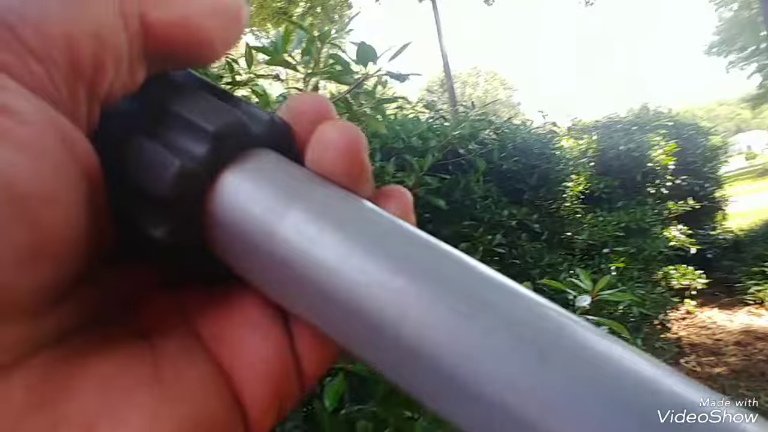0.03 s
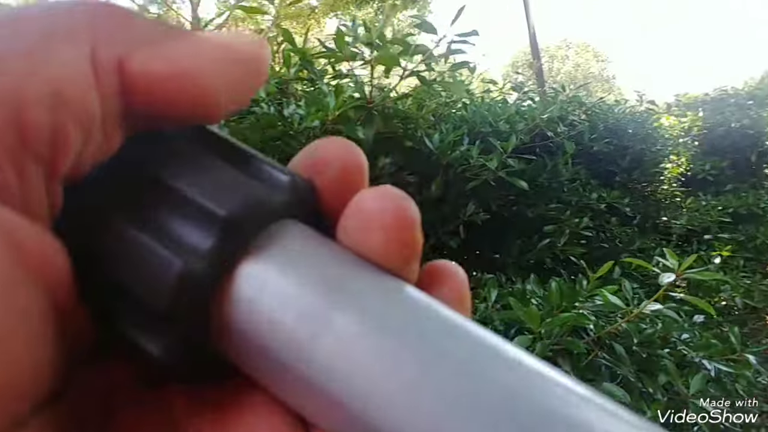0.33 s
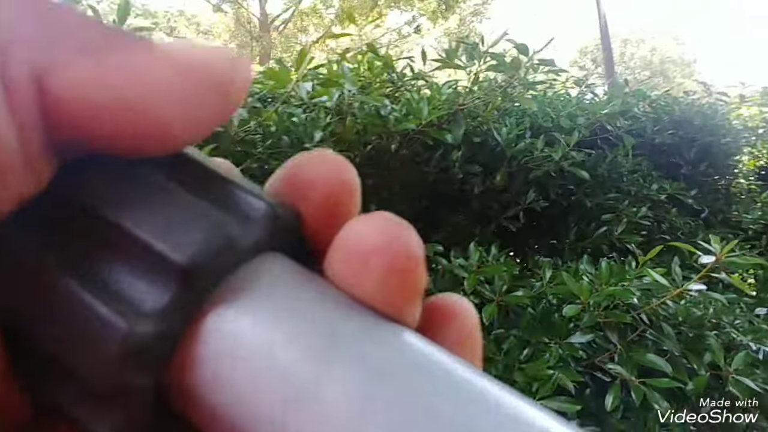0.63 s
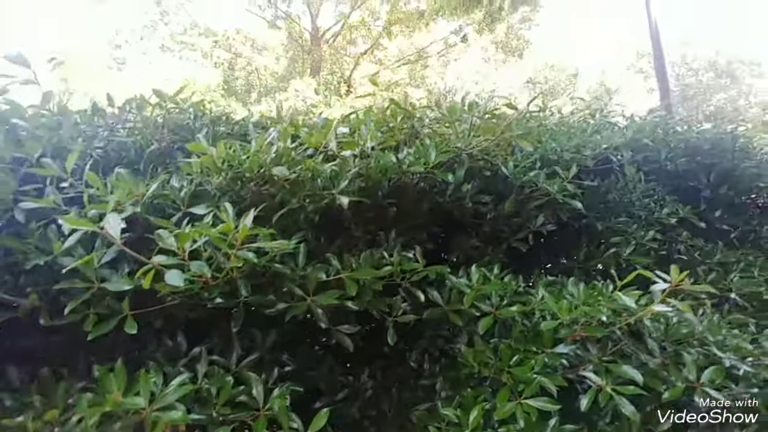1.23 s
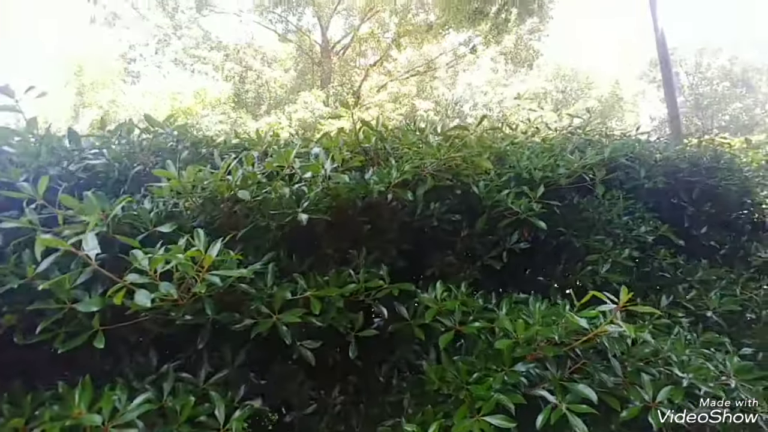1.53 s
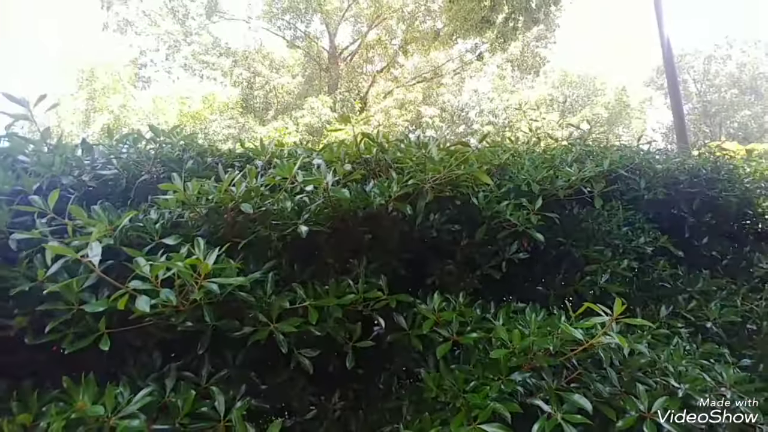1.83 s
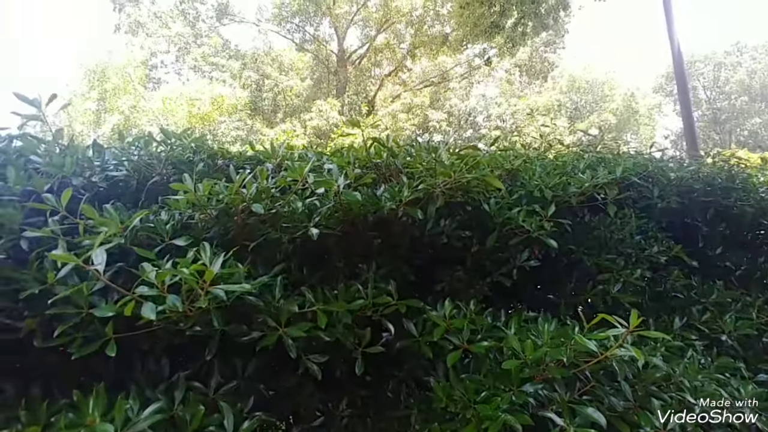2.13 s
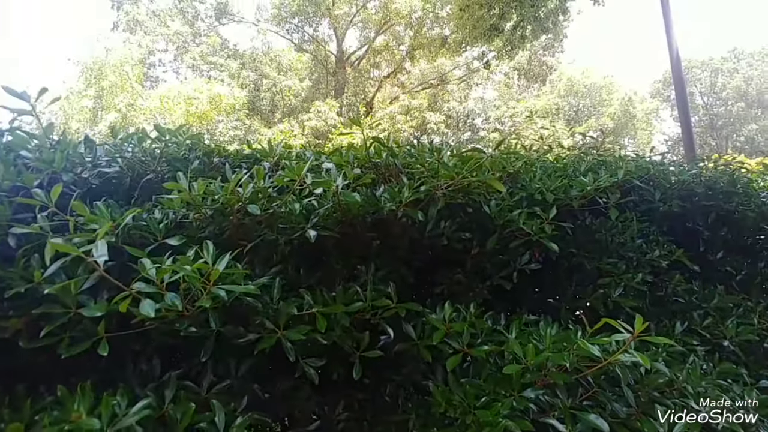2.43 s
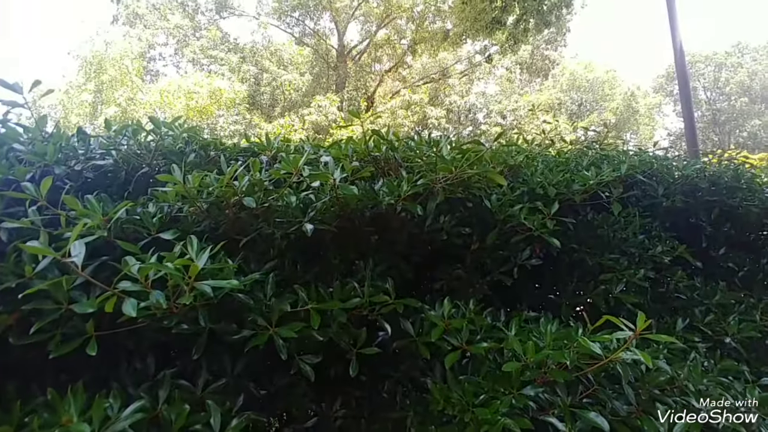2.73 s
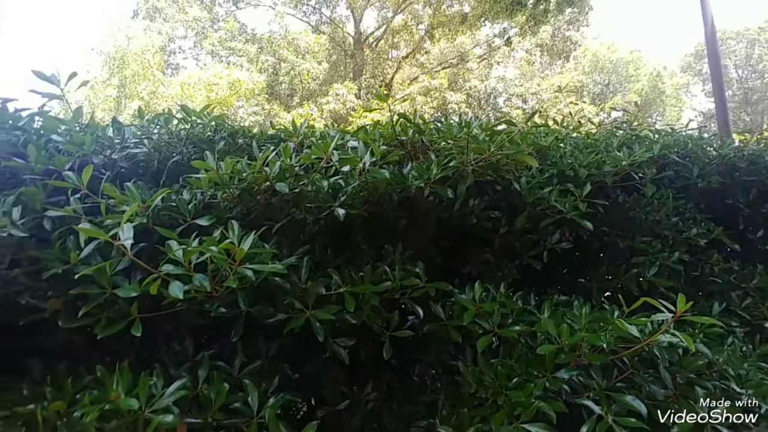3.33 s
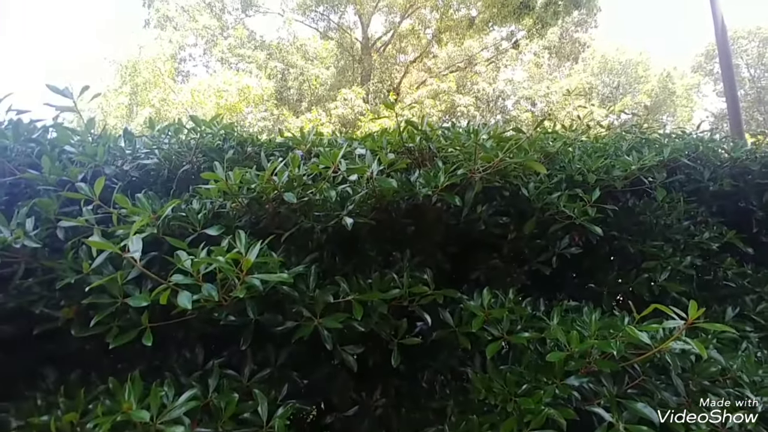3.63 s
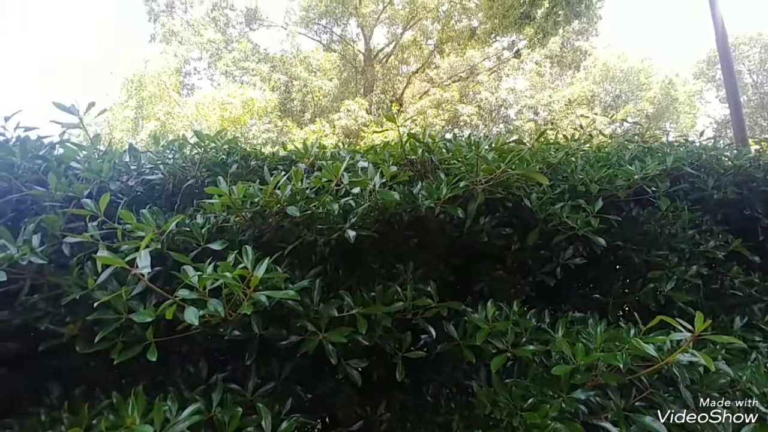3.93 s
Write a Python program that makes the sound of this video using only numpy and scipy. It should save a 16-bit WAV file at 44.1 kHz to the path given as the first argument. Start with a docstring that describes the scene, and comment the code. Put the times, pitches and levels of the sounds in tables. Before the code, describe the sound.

An electric hedge trimmer runs close by with a steady hum, whine and gear rattle. At about 1.1 seconds it switches off and falls in pitch, its steel blades scraping and separating into ringing clacks while wind nudges the microphone. It stops with a brief soft squeal near 2.3 seconds. The pole knocks at 2.5, small plastic ticks follow until 3, and faint outdoor ambience lasts to 4 seconds.

```python
"""A garden, with a stereo microphone close to an electric pole hedge trimmer running free.
The motor hums and whines over the rattle of its gears. Switched off, it coasts to a stop under friction,
and the strokes of the steel blades separate into single clacks, ending in a brief squeal.
Wind nudges the microphone, the pole knocks and settles, and the plastic handle ticks.
Behind it all lie a quiet outdoor wash and a thin ring in the distance."""
import sys
import numpy as np
from scipy import signal
from scipy.fft import rfft, irfft
from scipy.io import wavfile

SR = 44100
rng = np.random.default_rng(int(sys.argv[2]) if len(sys.argv) > 2 else 0)


def unload_wav(signal):
    """Save mono or channel-first audio to the path in sys.argv[1] as 16-bit WAV at rate SR, clipped to [-1, 1]."""
    wavfile.write(
        sys.argv[1],
        SR,
        np.round(np.clip(np.atleast_2d(signal).T, -1, 1) * 32767).astype(np.int16),
    )


N = 176400
T = np.arange(N) / SR


def amp(db):
    """Decibels to gain."""
    return np.exp(np.asarray(db) * np.log(10) / 20)


def unit(x):
    """Scales to rms 1."""
    return x / np.sqrt(np.mean(x ** 2) + 1e-20)


def curve(points):
    """Joins (time_s, value) points by straight lines, holding the end values."""
    return np.interp(T, *np.transpose(points))


def bump(centre_s, width_s):
    """A bell-shaped envelope peaking at 1."""
    return np.exp(-.5 * ((T - centre_s) / width_s) ** 2)


def drift(rate_hz):
    """Random wander up to about this rate, rms 1."""
    noise = rng.standard_normal(N // 16 + 1)
    hz = np.fft.rfftfreq(len(noise), 16 / SR)
    slow = irfft(rfft(noise) / (1 + (hz / rate_hz) ** 4), len(noise))
    return np.interp(T, np.linspace(0, T[-1], len(slow)), unit(slow))


def stereo_noise(likeness):
    """Left and right noise whose likeness fades in the treble."""
    left, other = rfft(rng.standard_normal((2, N)))
    likeness = likeness / (1 + (np.fft.rfftfreq(N, 1 / SR) / 6000) ** 4)
    right = likeness * left + np.sqrt(1 - likeness ** 2) * other
    return irfft(np.array([left, right]), N)


def colour(drive, spectrum, size=4096):
    """Rings a stereo drive through a minimum-phase filter with this spectrum and unit mean power gain."""
    hz, *sides_db = np.transpose(spectrum)
    bin_hz = abs(np.fft.fftfreq(size, 1 / SR))
    log_gain = np.log([amp(np.interp(np.log(bin_hz + 1), np.log(hz), db)) for db in sides_db])
    response = np.fft.ifft(np.exp(np.conj(signal.hilbert(log_gain)))).real[:, :size // 2]
    response /= np.sqrt((response ** 2).sum() / 2)
    return signal.oaconvolve(drive, response, axes=1)[:, :N]


def fuzzy_tone(hz, width_hz):
    """Noise in one narrow resonance."""
    phase = 2 * np.pi * hz * T
    return unit(drift(width_hz / 2) * np.cos(phase) + drift(width_hz / 2) * np.sin(phase))


def mode(hz, wander=.006):
    """A clean ring whose pitch wanders a little."""
    pitch_hz = hz * (1 + wander * drift(18))
    return unit(np.sin(2 * np.pi * np.cumsum(pitch_hz) / SR))


def blow(start_s, level_db, rise_s, t60_s):
    """Envelope of one contact: quick rise, exponential decay."""
    envelope, at = np.zeros(N), round(start_s * SR)
    age_s = T[:min(SR // 2, N - at)]
    decay_db = 60 * np.maximum(age_s - rise_s, 0) / t60_s
    envelope[at:at + len(age_s)] = amp(level_db - decay_db) * np.minimum(age_s / rise_s, 1)
    return envelope


def chatter(hits_per_s, spread_db, hiss_share, likeness):
    """Tiny impacts of uneven size in a bed of friction noise."""
    hits = rng.random(N) < hits_per_s / SR
    sizes = amp(spread_db * np.minimum(rng.exponential(1, N), 3))
    power = (1 - hiss_share) * unit(hits * sizes) ** 2 + hiss_share
    return np.sqrt(power) * stereo_noise(likeness)


# Motor shaft under power: time_s, rate_hz
SHAFT_RATE = [(0, 338.4), (.1, 339.3), (.48, 337.5), (.7, 338.2), (.9, 339.8), (1.075, 339.4)]
TURNS_PER_STROKE = 7


def drivetrain(off_s=1.075, coast_s=1.45):
    """Friction stops the shaft after switch-off; gives speed (1 to 0) and blade position in strokes."""
    speed = np.clip(1 - (T - off_s) / coast_s, 0, 1) ** 1.36
    shaft_hz = curve(SHAFT_RATE) * speed * (1 + .0007 * drift(16))
    strokes = np.cumsum(shaft_hz) / SR / TURNS_PER_STROKE + .3
    return speed, strokes


# Motor tones: cycles_per_stroke
TONE_ORDERS = [2, 7, 14, 63, 105, 147, 210]
# Each tone at full speed: left_db, right_db
TONE_LEVELS = [(-40, -51), (-30, -26.5), (-43, -43), (-35, -41), (-30.5, -32.5), (-43, -51), (-37, -45)]
# How each tone weakens as the shaft slows: speed_exponent
TONE_FALLS = [3, 6, 6, 5, 1.5, 10, 10]


def motor(speed, strokes, whine_order=105):
    """Stroke hum, shaft hum and the whine of gear teeth and fan, each wavering a little."""
    tones = np.zeros((2, N))
    flare = amp(6 * bump(1.11, .09))  # the gear whine flares as the drive lets go
    for order, sides_db, fall in zip(TONE_ORDERS, TONE_LEVELS, TONE_FALLS):
        phase = 2 * np.pi * order * strokes + .2 * drift(45)
        tone = unit(np.sin(phase) * amp(2.2 * drift(32))) * speed ** fall
        if order == whine_order:
            tone *= flare
        tones += amp(sides_db)[:, None] * tone
    return tones


# Resonances of the gear housing: frequency_hz, left_db, right_db
HOUSING_SPECTRUM = [(40, -27, -26), (120, -10.5, -21.5), (219.5, -13.5, -9.0), (300, -9, -8.5),
                    (470, -4.0, -3.5), (590, 1, -2), (704, -4.5, -7), (800, 0, -1.5), (963, -6, 3),
                    (1050, -11, -7), (1340, -4, -4.5), (1600, -5, -14.5), (1890, -10.5, -1),
                    (2160, -8.5, -17), (2550, -8, -11), (2750, -5.5, -13), (3000, -3, -8.5),
                    (3230, -4.5, -8), (3530, -8.5, -6), (4040, -5.5, -18), (4500, -4, -6.5),
                    (4700, -11.5, -14.5), (6600, -15.5, -19), (7100, -13, -25), (8800, -16, -16.5),
                    (12000, -26.5, -38.5)]


def gears(speed, strokes):
    """Loose gear teeth rattle in the housing, throbbing with the stroke and the shaft."""
    phase = 2 * np.pi * strokes
    throb_db = 1.5 * np.cos(phase) + .5 * np.cos(2 * phase) + np.cos(TURNS_PER_STROKE * phase)
    throb_db += .73 * drift(81)
    rattle = unit(chatter(2200, spread_db=3, hiss_share=.66, likeness=.62) * amp(throb_db))
    low = signal.sosfiltfilt(signal.butter(2, 1400, fs=SR, output="sos"), rattle)
    rattle += low * (amp(2.3 * np.tanh(drift(48))) - 1)  # the low knocking is the most uneven
    return colour(rattle * amp(-14.5) * speed ** 2.14, HOUSING_SPECTRUM)


# Blades sliding over each other: time_s, level_db
SCRAPE_LEVEL = [(0, -34.5), (.95, -30), (1.15, -20), (1.42, -19), (1.62, -22), (1.78, -19), (2.0, -20),
                (2.2, -23.5), (2.3, -30.5), (2.4, -45.5), (2.6, -78.5)]
# Last blade reversals, heard singly: start_s, clack_db, ring_db
CLACKS = [(1.402, -15, -28), (1.447, -12, -29), (1.523, -13, -18), (1.558, -25, -18.5), (1.663, -17.5, -22),
          (1.707, -15, -16), (1.749, -14, -21), (1.797, -16, -20), (1.848, -12, -24.5),
          (1.904, -17.5, -25.5), (1.969, -13, -23), (2.041, -28.5, -34), (2.14, -15.5, -44),
          (2.347, -25, -65)]
# Body of the blades: frequency_hz, left_db, right_db
BLADE_SPECTRUM = [(230, -18.5, -23), (340, -12.5, -15), (519, 0.0, -7.5), (700, -13.5, -9),
                  (1080, -7.5, -7.5), (1700, -5.5, -5.5), (2120, -6.5, -7.5), (2250, 1, -2.5),
                  (2380, -5, -12), (2550, -4, -6), (2900, -8, -10.5), (3400, -3, -9.5), (4200, -2.5, -13.5),
                  (4670, -1.0, -3), (5050, -12, -16.5), (6200, -15.5, -23), (8360, -15, -17),
                  (12000, -29.5, -41)]
# Steel ringing at each clack: pitch_hz, gain_db
BLADE_MODES = [(2270, -7), (4400, -6), (4570, -2.5), (4730, -5)]


def blades(speed, strokes, lull_s=.006, rise_s=.003):
    """Steel blades scrape with each stroke, duller as they slow, and clack and ring at the last turns."""
    throb_db = speed * (1.9 * np.cos(2 * np.pi * strokes) + .7 * drift(55)) + .9 * drift(90)
    # The scrape drops as the blades turn round, just before a clack.
    lull_db = 4.5 * sum(np.maximum(1 - abs(T - s + lull_s) / (2 * lull_s), 0) for s, _, _ in CLACKS)
    scrape = chatter(1500, spread_db=1, hiss_share=.72, likeness=.74)
    scrape *= amp(curve(SCRAPE_LEVEL) + throb_db - lull_db)
    dull = signal.lfilter(*signal.butter(1, 2500, fs=SR), scrape)
    scrape = dull + (scrape - dull) * speed ** .91
    contacts = sum(blow(s, db, rise_s, t60_s=.085) for s, db, _ in CLACKS)
    clacks = signal.lfilter([1, -.55], [1], contacts * stereo_noise(likeness=.61))  # treble lift
    passing_mode = mode(3870) * bump(1.85, .11)  # rings only midway through the coast
    steel = sum(amp(db) * mode(hz) for hz, db in BLADE_MODES) + passing_mode
    ring = steel * sum(blow(s, db, rise_s, t60_s=.11) for s, _, db in CLACKS)
    return colour(scrape + clacks, BLADE_SPECTRUM) + ring * amp([[0], [-4]])


# Gusts at the microphone: time_s, level_db
GUSTS = [(1.1, -48), (1.32, -35), (1.44, -29), (1.52, -26.5), (1.65, -47.5), (1.75, -29.5), (1.82, -32.5),
         (1.98, -35), (2.3, -56), (2.45, -58), (3.9, -67), (3.96, -48), (4, -61)]
# Rumble of the buffeting: frequency_hz, left_db, right_db
WIND_SPECTRUM = [(15, -20, -17), (45, -18.5, 8), (119, -15.5, 5), (220, -42.5, -16.5), (2000, -88.5, -77.5)]


def wind():
    """Wind buffets the microphone, mostly its right port."""
    buffeting = stereo_noise(likeness=.086) * amp(curve(GUSTS) + 2.3 * drift(24))
    return colour(buffeting, WIND_SPECTRUM)


def blade_squeal():
    """The blades sing briefly just before they stop."""
    return fuzzy_tone(580, width_hz=39) * amp(-32.5) * bump(2.253, .03)


# The pole knocking and settling: start_s, level_db, rise_s, t60_s
KNOCKS = [(2.504, -23, 0.0097, 0.06), (2.517, -13.5, 0.00093, 0.037), (2.528, -30, .002, 0.37),
          (2.629, -38, .003, 0.1), (2.642, -38.5, .002, 0.061), (2.677, -42.5, 0.004, 0.088)]
# Body of the pole: frequency_hz, left_db, right_db
POLE_SPECTRUM = [(100, -16, -13), (218, -9.5, -14), (455, 4, 1), (684, -7.5, 2), (920, 5.5, 0.5),
                 (1610, -1, -3), (2280, -2, 0), (2570, -13, -26), (3360, -10, -12), (4550, -11.5, -11),
                 (6070, -14, -24), (9900, -22.5, -22), (12000, -33, -56)]


def pole():
    """The pole knocks, then settles with a last hollow tap."""
    contacts = sum(blow(*knock) for knock in KNOCKS)
    knocks = contacts * chatter(2500, spread_db=4.5, hiss_share=.43, likeness=.69)
    tap = mode(1060) * blow(2.674, level_db=-33.5, rise_s=.0044, t60_s=.1)
    return colour(knocks, POLE_SPECTRUM) + tap


# Ticks of the handle: start_s, level_db, t60_s
TICKS = [(2.526, -22, 0.07), (2.617, -37.5, 0.023), (2.645, -40, 0.032), (2.737, -43.5, 0.034),
         (2.933, -42.5, 0.03), (2.996, -38, .025)]
# Body of the handle: frequency_hz, left_db, right_db
HANDLE_SPECTRUM = [(200, -4, -12), (3220, 3.5, 1), (8000, -4.5, -7), (12000, -18, -19)]


def handle():
    """The plastic handle gives a few small, dry ticks."""
    contacts = sum(blow(s, db, rise_s=.001, t60_s=t60) for s, db, t60 in TICKS)
    return colour(contacts * stereo_noise(likeness=.17), HANDLE_SPECTRUM)


# Garden ambience: time_s, level_db
GARDEN_LEVEL = [(0, -69), (2.6, -43), (2.85, -47), (3.15, -46), (3.395, -48), (3.43, -59), (3.7, -57.5),
                (4, -54)]
# Its bass-heavy colour: frequency_hz, left_db, right_db
GARDEN_SPECTRUM = [(30.2, -2, -12.5), (71.4, 1, -0.5), (187, -4, -5), (223, -8, -14), (854, -10.5, -9.5),
                   (2430, -21.5, -20), (3480, -20, -22), (6500, -31.5, -30.5), (9800, -35, -34),
                   (12000, -45.5, -59)]
# A ring far from the microphone: time_s, level_db
FAR_RING_LEVEL = [(2.4, -55), (2.85, -73), (3.14, -56), (3.45, -77), (3.75, -72), (3.92, -53.5), (4, -60)]


def garden():
    """A soft outdoor wash and a thin, distant ring emerge once the trimmer is still."""
    wash = stereo_noise(likeness=.68) * amp(curve(GARDEN_LEVEL) + .41 * drift(45))
    ring = np.array([fuzzy_tone(2250, width_hz=170) for _ in range(2)])
    return colour(wash, GARDEN_SPECTRUM) + ring * amp(curve(FAR_RING_LEVEL))


def scene(port_delay_s=.00041):
    """One shaft drives motor, gears and blades; all reaches the microphone's right port a little later."""
    speed, strokes = drivetrain()
    trimmer = motor(speed, strokes) + gears(speed, strokes) + blades(speed, strokes)
    left, right = trimmer + wind() + blade_squeal() + pole() + handle() + garden()
    lag = round(port_delay_s * SR)
    return np.array([left, np.pad(right, (lag, 0))[:N]])


def record(dry, knee=.6, ceiling=.85, cutoff_hz=12400):
    """The recorder rounds off the highest peaks, then limits the band."""
    excess = np.maximum(abs(dry) - knee, 0)
    headroom = ceiling - knee
    limited = dry - np.sign(dry) * (excess - headroom * np.tanh(excess / headroom))
    lowpass = signal.firwin(511, cutoff_hz, window=("kaiser", 9), fs=SR)
    return signal.oaconvolve(limited, lowpass[None], "same", axes=1)


dry = scene()
out = record(dry)
unload_wav(out)
```